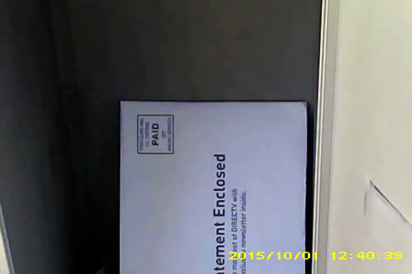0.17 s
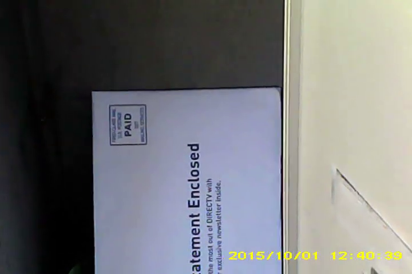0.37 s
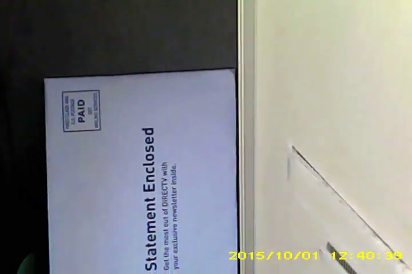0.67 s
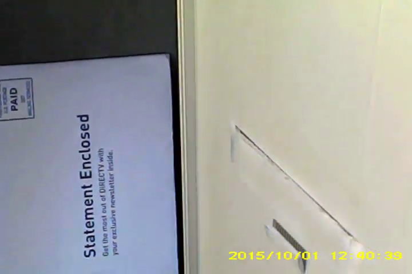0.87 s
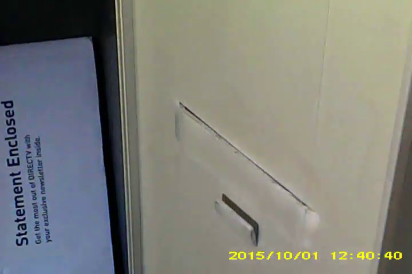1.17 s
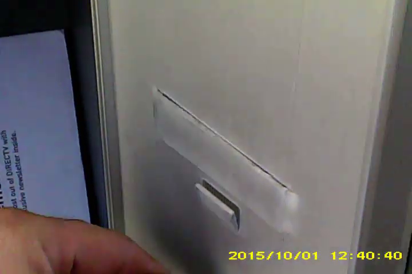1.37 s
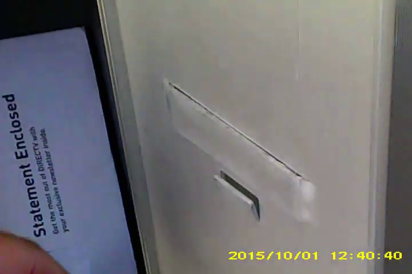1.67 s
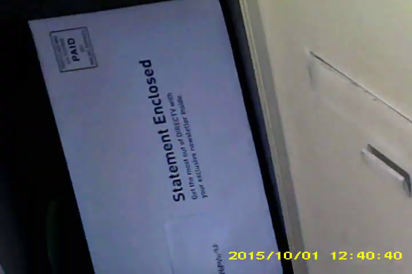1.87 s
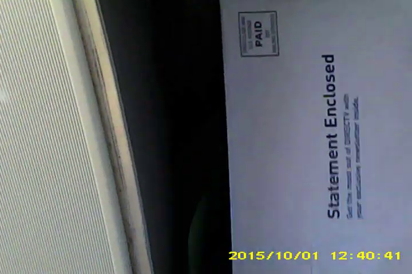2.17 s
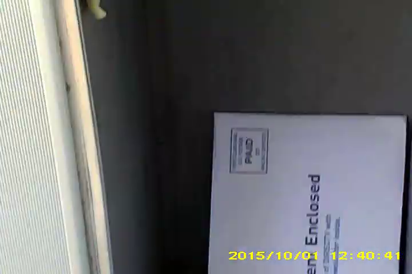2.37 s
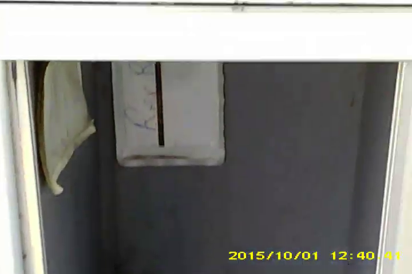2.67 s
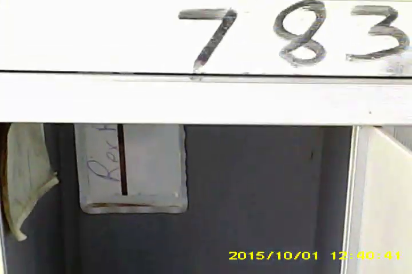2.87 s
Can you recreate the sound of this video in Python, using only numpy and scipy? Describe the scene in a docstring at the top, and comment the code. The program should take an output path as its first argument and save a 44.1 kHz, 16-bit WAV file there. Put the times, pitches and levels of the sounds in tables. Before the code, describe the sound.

A sheet-metal mailbox door bangs shut beside a road, very close to a cheap, dull-sounding microphone. For two seconds there is low traffic rumble and tyre hiss, with tiny faint ticks near 0.6 and 0.75. At 1.97 a latch click leads into a loud, clipped metallic bang, rebounding rapidly with boomier, weaker knocks and small ticks until about 2.5. Traffic continues to 3 seconds, with faint electronic hiss and whine.

```python
"""Beside a road, close to a small camera, a sheet-metal mailbox door bangs shut and rebounds a few times.
Each blow rings one bank of decaying modes, dense for the sheet and strong for the door;
latch and hinge add ticks made of short inharmonic partials.
Traffic rumble and tyre hiss are shaped noise, as is the faint hiss of the electronics.
The bang overloads the microphone input, which also has dull treble and a thin electrical tone."""
import sys
import numpy as np
from scipy import signal
from scipy.io import wavfile
from scipy.ndimage import uniform_filter1d

SR = 44100
rng = np.random.default_rng(int(sys.argv[2]) if len(sys.argv) > 2 else 0)


def undo_db(level):
    """Turn decibels back into plain size, where 20 dB means ten times bigger."""
    steps = np.asarray(level, float) / 20
    return 10 ** steps


def dump_mix(stems):
    """Bounce the given channels to the path in sys.argv[1] as a 16-bit WAV at rate SR."""
    frames = np.atleast_2d(stems).T  # one column per channel
    limited = np.clip(frames, -1, 1)  # hard clip at full scale
    pcm = np.round(limited * 32767).astype(np.int16)
    wavfile.write(sys.argv[1], SR, pcm)


N = 132741  # length in samples


def read(points, hz):
    """Reads a table of (Hz, value) points on a log-frequency axis."""
    f, value = np.transpose(points)
    return np.interp(np.log(hz + 1), np.log(f + 1), value)


def evened(x):
    """Scales to unit rms."""
    return x / np.sqrt(np.mean(abs(x) ** 2) + 1e-20)


def add(mix, start_s, sound):
    """Mixes a sound in at a time, cut off at the end of the mix."""
    part = mix[round(start_s * SR):][:len(sound)]
    part += sound[:len(part)]


def noise(spectrum, patch_db, size=2048):
    """Shaped noise of unit rms: random short-time spectra whose level drifts in patches (rms in dB)."""
    frames = 4 * N // size + 6
    hz = np.fft.rfftfreq(size, 1 / SR)
    real, imag, patches = rng.standard_normal((frames, len(hz), 3)).T
    # blur over 14 bins and 12 frames
    patches = uniform_filter1d(uniform_filter1d(patches, size=14, axis=0), size=12, axis=1)
    level_db = read(spectrum, hz)[:, None] + patch_db * evened(patches)
    spectra = (real + 1j * imag) * undo_db(level_db)
    return evened(signal.istft(spectra, nperseg=size, noverlap=3 * size // 4)[1][:N])


# Blows of the door. Each row: start in seconds, strength in dB, extra boom in dB, boom pitch in Hz,
# extra treble of the contact in dB, time constant of the rise in seconds.
BLOWS = [(1.9735, -11, -4, 120, -7, 0.0023), (1.9797, 5.5, -1, 170, 3, 0.0017),
         (1.998, 3, -1, 165, 8, 0.004), (2.020, -0.5, 5, 120, 4.5, 0.0042),
         (2.040, -0.5, -1, 120, 1.5, 0.0031), (2.060, -4.5, 9, 121, -1, 0.0036),
         (2.076, -3.5, 10.5, 125, -2, 0.0057), (2.098, -16.5, 16, 155, -6, 0.0073),
         (2.121, -12, 8, 150, -5, 0.0046), (2.1434, -6.5, 10, 190, -5, 0.0015),
         (2.162, -6.5, 15, 190, -4, 0.0037), (2.174, -13, 19, 116, -1.5, 0.0033),
         (2.204, -11, 7, 190, -10.5, 0.003), (2.265, -11.5, 9.5, 153, -8.5, 0.0068),
         (2.296, -12, 13, 155, -12, 0.0059), (2.3717, -14, 8, 117, -14, 0.0011),
         (2.400, -16, 13.5, 120, -17, 0.004), (2.469, -16, 10.5, 151, -17.5, 0.0058)]
# Balance of the dense modes of the sheet. Each row: frequency in Hz, relative level in dB.
PANEL_BALANCE = [(30, -9.5), (45, -8), (75, -20.5), (115, -5), (190, -6.5), (280, -9.5), (450, -3),
                 (900, -3), (2100, -4.5), (2500, -16.5), (3200, -22), (3750, -10.5), (4400, -24),
                 (6000, -32), (9000, -29.5), (12000, -26)]
# Ring time of the dense modes. Each row: frequency in Hz, 60 dB decay time in seconds.
PANEL_T60 = [(40, 0.29), (150, 0.2), (500, 0.27), (1500, 0.2), (4000, 0.29), (7000, 0.15), (12000, 0.081)]
# Strong modes of the door. Each row: frequency in Hz, relative level in dB, 60 dB decay time in seconds.
STRONG_MODES = [(120, -1.5, 0.11), (155, -5, 0.26), (190, -6.5, 0.14), (450.4, -5.5, .22), (523, -19, 0.4),
                (686, -19.5, 0.12), (815, -10.5, 0.48), (1048, -5.5, 0.4), (1610, -11, 0.35),
                (1904, -20.5, 0.1), (2130, -15.5, .3), (3540, -19.5, 0.19)]
TREBLE_HZ = 4800  # modes above this need a hard contact
BOOM_OCTAVES = 0.28  # width of the group of low box modes that one blow favours


def door(count=640):
    """Modal sheet metal: every blow rings the same dense and strong modes with its own random shares."""
    t = np.arange(SR * 2 // 5) / SR  # each ring is cut at 0.4 s
    out = np.zeros(N)

    # dense modes from 30 to 12600 Hz, crowding towards the treble
    place = (np.arange(count) + rng.random(count)) / count
    dense_hz = 30 * 420 ** np.sqrt(place)
    dense_size = undo_db(read(PANEL_BALANCE, dense_hz)) * np.sqrt(np.gradient(dense_hz) / dense_hz)
    strong_hz, strong_db, strong_t60 = np.transpose(STRONG_MODES)
    hz = np.r_[dense_hz, strong_hz]
    size = np.r_[dense_size, undo_db(strong_db) / 4]
    t60 = np.r_[read(PANEL_T60, dense_hz), strong_t60]
    decay = np.log(1000) / t60
    rings = np.exp(np.outer(2j * np.pi * hz - decay, t).astype(np.complex64))

    # one column of mode weights per blow
    share, turn = rng.random((len(BLOWS), len(hz), 2)).T
    starts, strength_db, boom_db, boom_hz, treble_db, rises = np.transpose(BLOWS)
    hz = hz[:, None]
    near_boom = np.exp(-(np.log2(hz / boom_hz) / BOOM_OCTAVES) ** 2)
    hardness_db = treble_db / (1 + (TREBLE_HZ / hz) ** 6)
    blow_gain = undo_db(strength_db + hardness_db + boom_db * near_boom)
    weights = size[:, None] * (0.5 + share) * np.exp(2j * np.pi * turn) * blow_gain
    sounds = (weights.T.astype(np.complex64) @ rings).real
    for start, sound, rise in zip(starts, sounds, rises):
        add(out, start, sound * (1 - np.exp(-t / max(rise, 1e-4))))
    return out


# Small ticks of latch and hinge. Each row: start in seconds, starting level in dB, centre pitch in Hz,
# spread of the partials in octaves, 60 dB decay time in seconds.
TICKS = [(0.5815, -42, 5500, .9, .012), (.7462, -42, 5500, .9, .012), (1.9719, -27, 9200, 1.1, .015),
         (1.9719, -17, 3830, 0.099, .035), (2.212, -44, 9300, .3, .015), (2.224, -51, 8000, 1.2, .01),
         (2.233, -52, 8000, 1.2, .01), (2.2375, -30, 6500, 1.7, .012), (2.2425, -44, 6500, 1.9, 0.022),
         (2.255, -46, 5900, 1.4, 0.034), (2.272, -56, 9500, .6, .015), (2.310, -67, 9600, .6, .02),
         (2.435, -49, 9800, .35, .012), (2.454, -51, 9600, .35, .012), (2.514, -54, 9150, .25, .012)]


def ticks():
    """Small metal contacts: each tick is a cluster of 16 short inharmonic partials."""
    t = np.arange(SR // 20) / SR
    out = np.zeros(N)
    draws = rng.random((len(TICKS), 2, 16, 1))
    for (start, db, hz, spread, t60), (jitter, phase) in zip(TICKS, draws):
        octaves = spread * ((np.arange(16)[:, None] + jitter) / 16 - 0.5)
        partials = np.sin(2 * np.pi * (hz * 2 ** octaves * t + phase)).sum(0)
        attack = np.minimum(t * 4000, 1)  # 0.25 ms
        add(out, start, undo_db(db - 60 * t / t60) * partials / 4 * attack)
    return out


# Traffic levels before the swell. Each row: time in seconds, rumble in dB, tyre hiss in dB,
# upper hiss in dB.
ROAD_LEVELS = [(0.0, -20, -20, -22), (0.31, -21.5, -21, -19), (0.54, -20, -19, -17.5),
               (0.88, -20, -21, -21), (1.14, -21, -22, -18.5), (1.29, -21.5, -23, -18.5),
               (1.56, -23, -23, -22), (1.96, -21, -25.5, -22.5), (2.17, -20, -30, -23.5),
               (2.37, -24, -28, -26), (2.66, -19.5, -25, -25), (3.01, -22, -24.5, -25)]
# Tone of the three layers. Each row: frequency in Hz, relative density in dB per Hz.
RUMBLE = [(12, -33), (20, 3), (129, -3.5), (167, -14.5), (254, -14.5), (347, -16.5), (450, -17),
          (580, -36.5), (990, -120)]
HISS = [(120, -42.5), (200, -6), (258, -3), (352, -6), (393, -7), (431, -2.5), (771, 0.5), (1500, -9),
        (1950, -30.5), (3300, -120)]
UPPER_HISS = [(300, -89.5), (650, -11), (1100, -0.5), (1200, -6.5), (1400, -1.5), (2110, -3), (2490, -15.5),
              (3050, -22.5), (3700, -22.5), (4100, -30.5), (4700, -41), (5500, -49), (7000, -53.5),
              (8000, -55), (9000, -53.5), (10500, -55.5), (12000, -44)]


def road():
    """Traffic as rumble and two layers of tyre hiss, each on its own level, under one slow swell."""
    t = np.arange(N) / SR
    times, *levels = np.transpose(ROAD_LEVELS)
    swell = np.zeros(N)
    for f in np.geomspace(1, 12, num=16):  # Hz
        swell += np.sin(2 * np.pi * (f * t + rng.random())) / np.sqrt(f)
    layers = np.zeros(N)
    for db, spectrum in zip(levels, (RUMBLE, HISS, UPPER_HISS)):
        layers += undo_db(np.interp(t, times, db)) * noise(spectrum, patch_db=1.45)
    return layers * undo_db(0.47 * evened(swell))  # swell of 0.47 dB rms


# Tone of the electronics' hiss. Each row: frequency in Hz, relative density in dB per Hz.
SELF_HISS = [(2000, -91.5), (3000, -32), (4500, -4), (6000, 3.5), (7000, -7.5), (9000, -11), (12000, -4.5),
             (13000, -61)]


def electronics_hiss():
    """Steady faint hiss of the electronics: shaped noise at -65.5 dB rms."""
    return undo_db(-65.5) * noise(SELF_HISS, patch_db=1.5)


def scene():
    """Door, latch and hinge ticks, road, and the steady hiss at the microphone input."""
    return np.array([door() + ticks() + road() + electronics_hiss()])


# Treble roll-off after the overload. Each row: frequency in Hz, gain in dB.
MIC_ROLLOFF = [(2500, -1), (4500, -4), (6000, -7), (10000, -6), (11500, -19), (13000, -40), (16000, -60)]


def microphone(dry):
    """Input overload rounds peaks off below a ceiling, then a linear-phase filter dulls the treble."""
    ceiling, knee = 0.73, 8  # full scale is 1; a higher knee bends more sharply
    x = dry / (1 + abs(dry / ceiling) ** knee) ** (1 / knee)
    hz = np.linspace(0, SR / 2, num=257)
    rolloff = signal.firwin2(255, hz, undo_db(read(MIC_ROLLOFF, hz)), fs=SR)
    return signal.oaconvolve(x, rolloff[None], "same")


def whine():
    """Thin electrical tone: a steady 7348 Hz sine at -76.5 dB rms."""
    return undo_db(-76.5) * np.sqrt(2) * np.sin(2 * np.pi * 7348 * np.arange(N) / SR)


def top_cut(x):
    """Nothing passes above the cut-off."""
    return signal.sosfilt(signal.butter(12, 12200, fs=SR, output="sos"), x)


def record(dry):
    """Microphone overload and roll-off, then the electrical tone and a small constant offset."""
    mix = microphone(dry) + whine() - 0.0046
    return top_cut(mix)


dry = scene()
out = record(dry)
dump_mix(out)
```